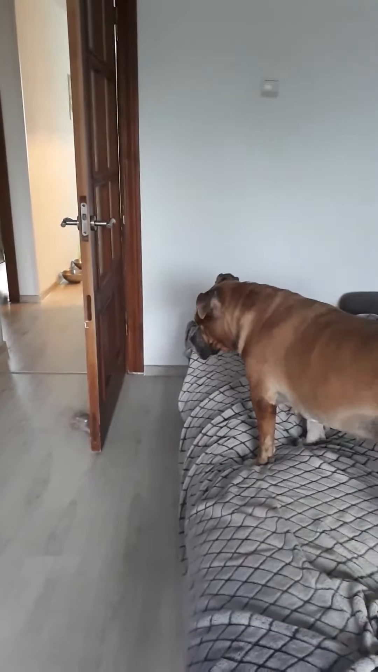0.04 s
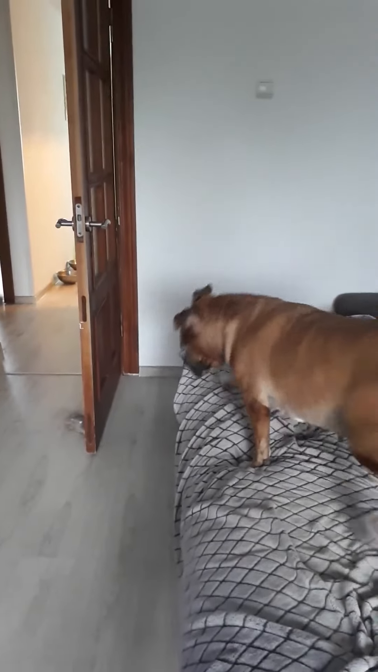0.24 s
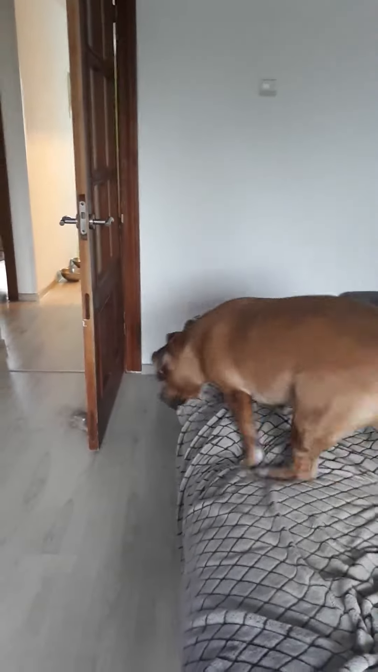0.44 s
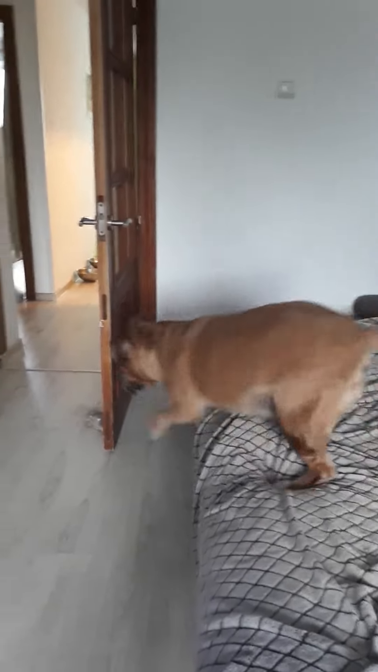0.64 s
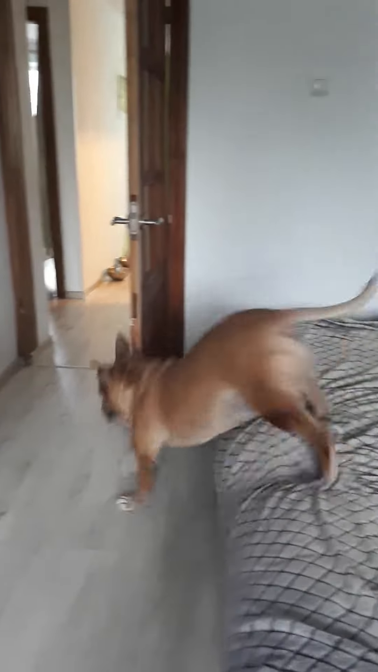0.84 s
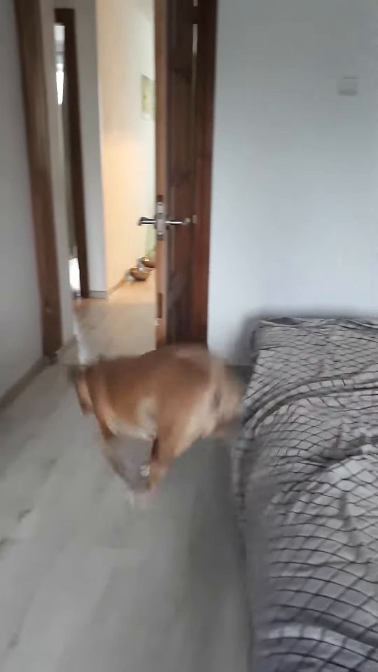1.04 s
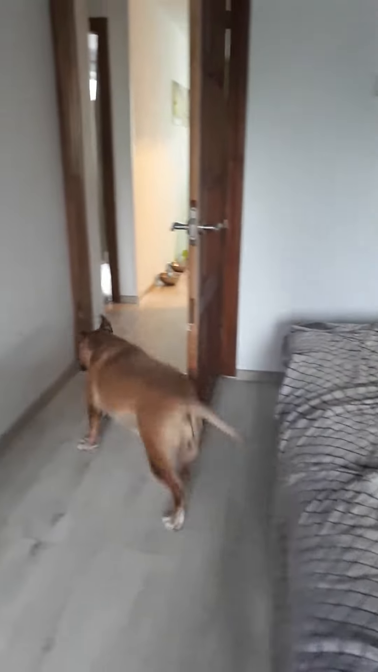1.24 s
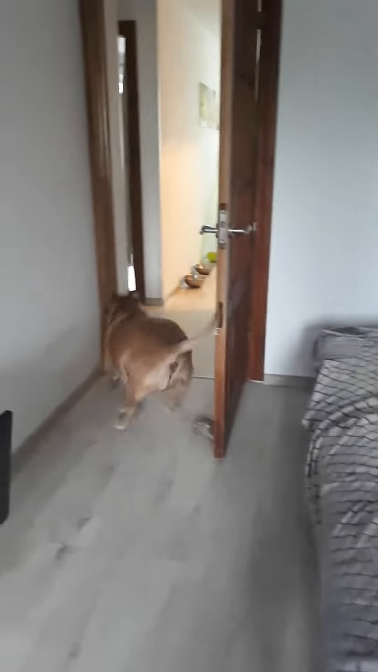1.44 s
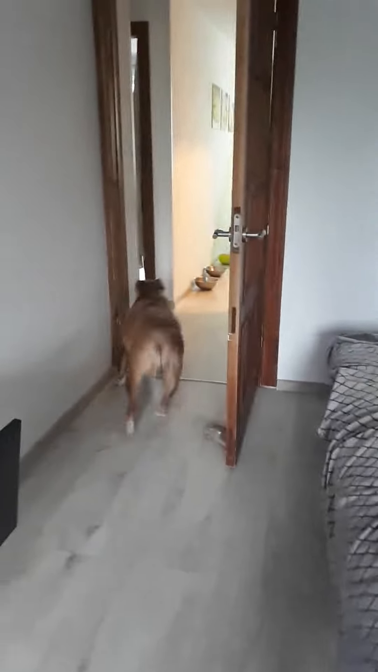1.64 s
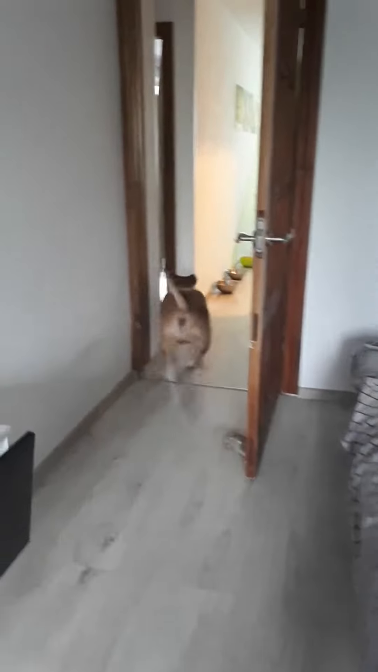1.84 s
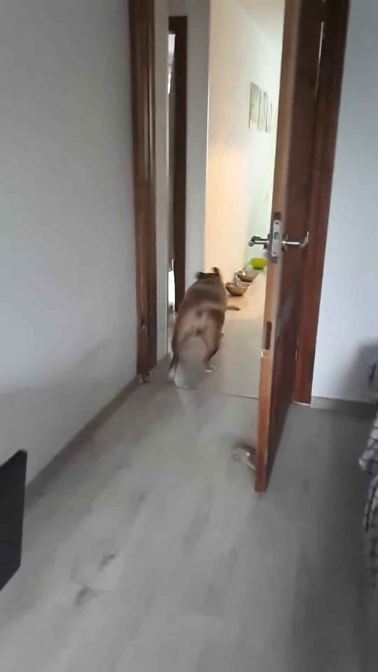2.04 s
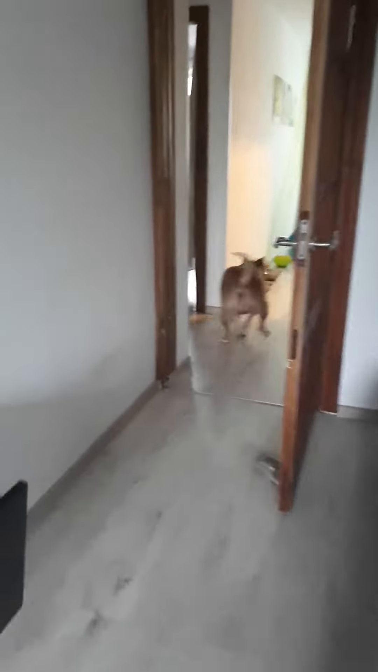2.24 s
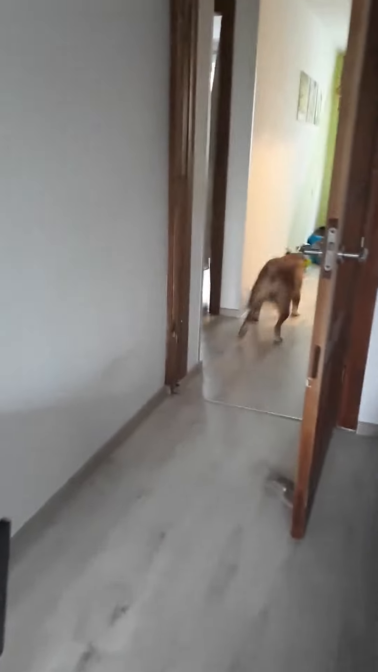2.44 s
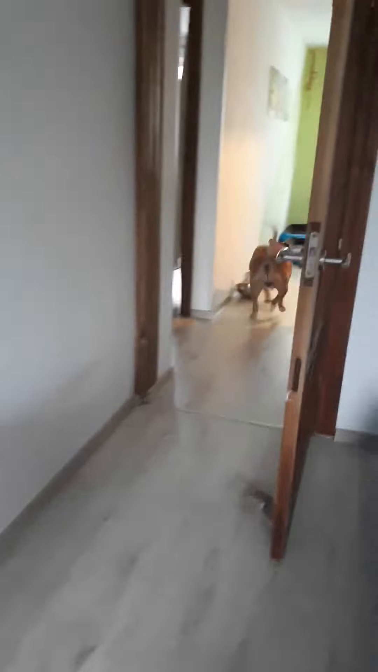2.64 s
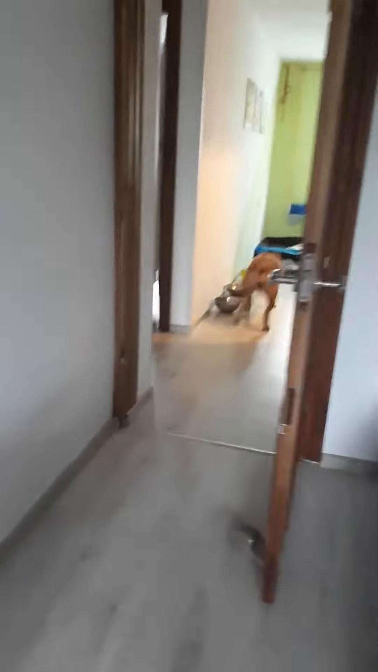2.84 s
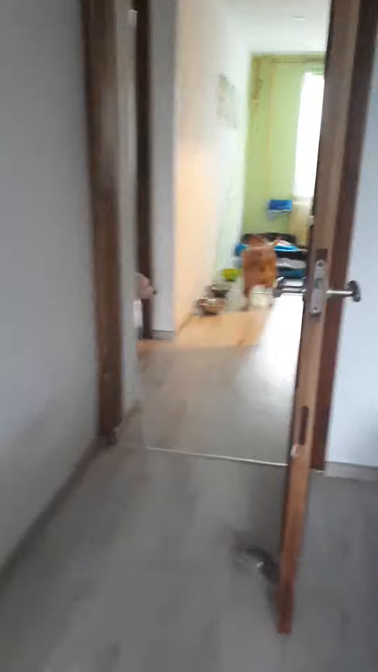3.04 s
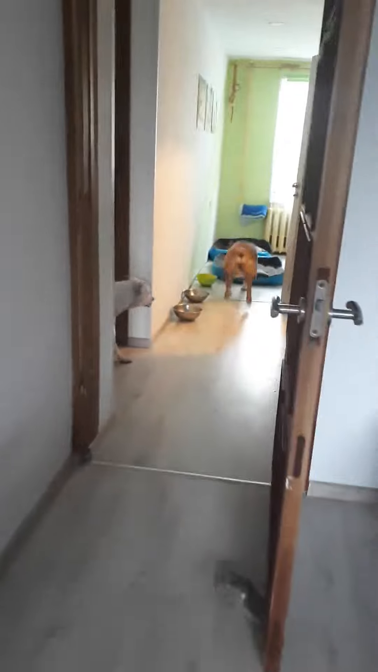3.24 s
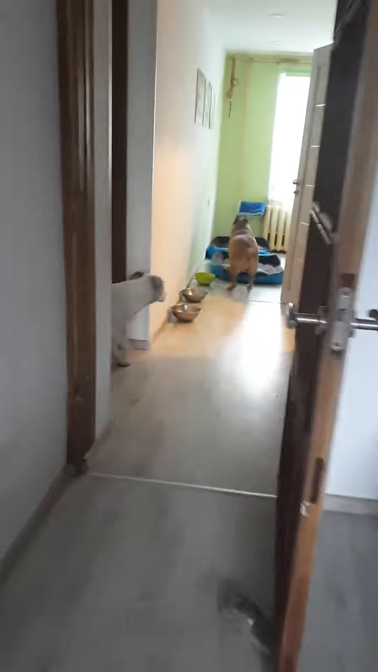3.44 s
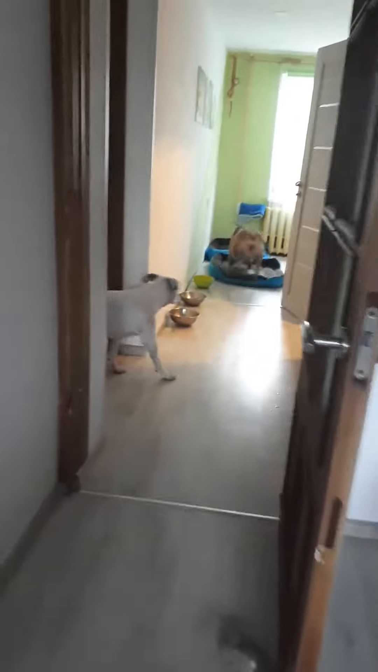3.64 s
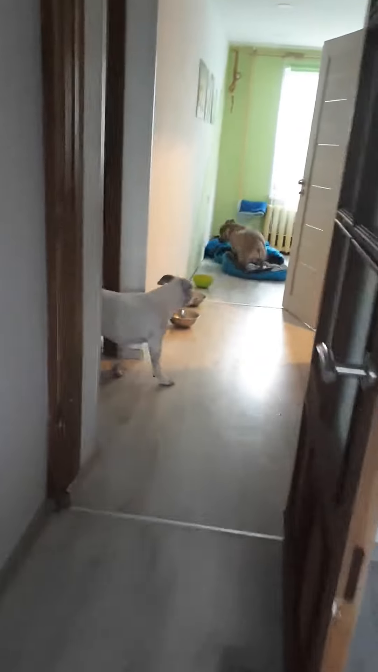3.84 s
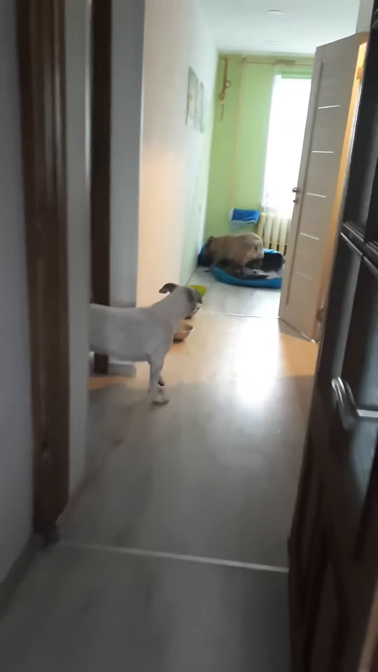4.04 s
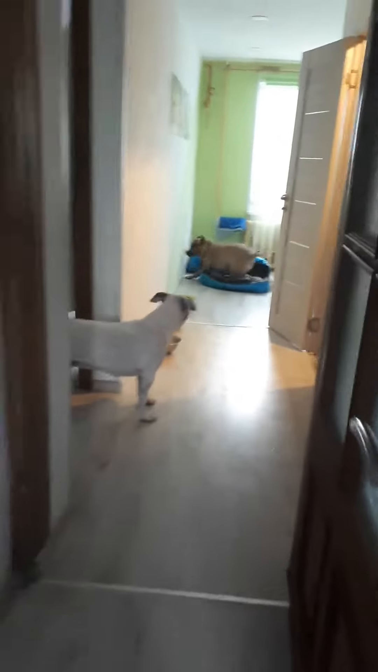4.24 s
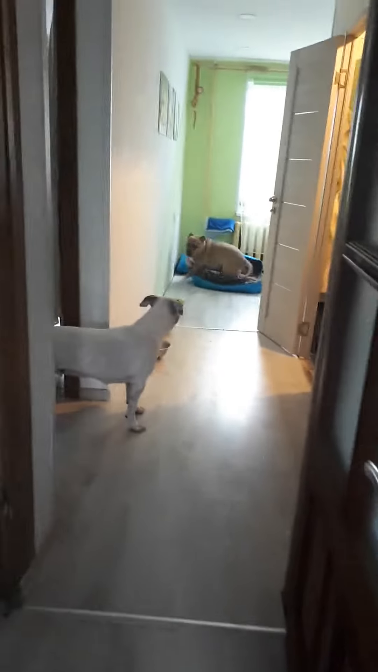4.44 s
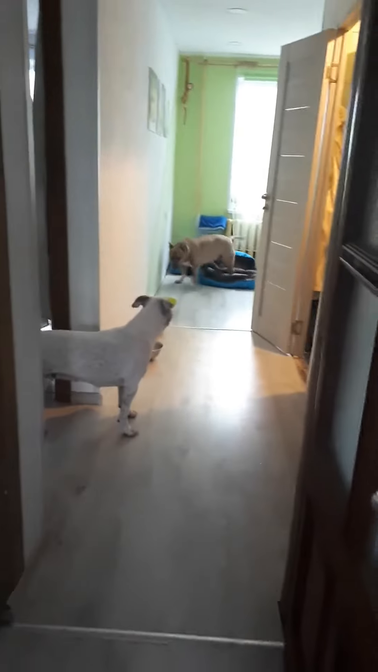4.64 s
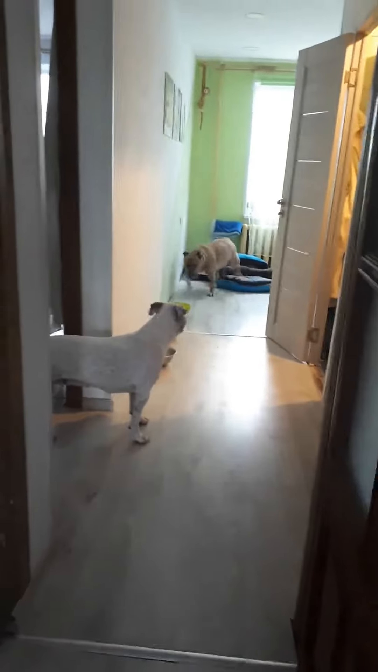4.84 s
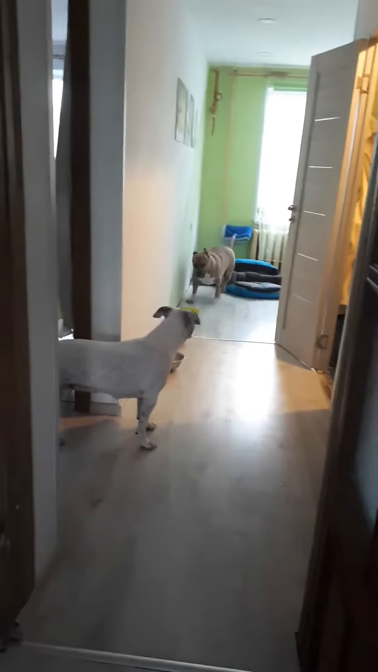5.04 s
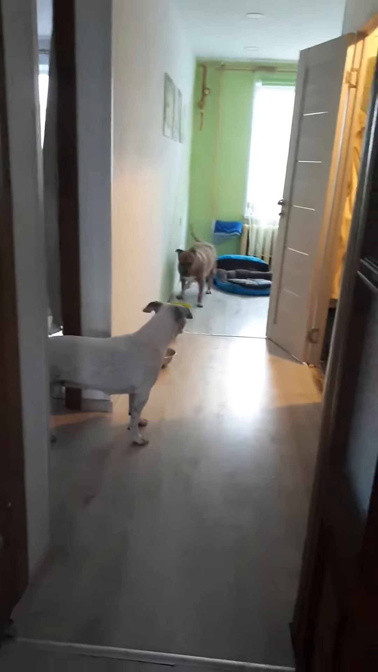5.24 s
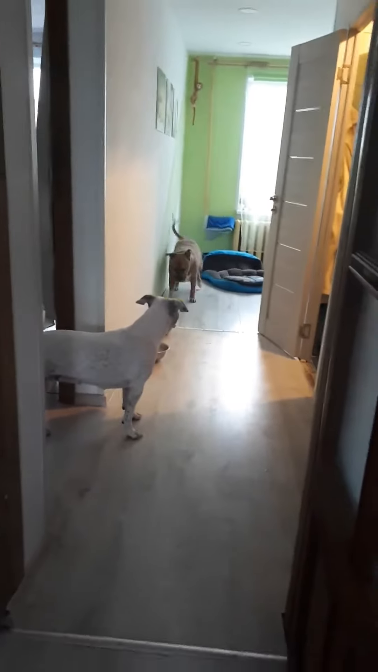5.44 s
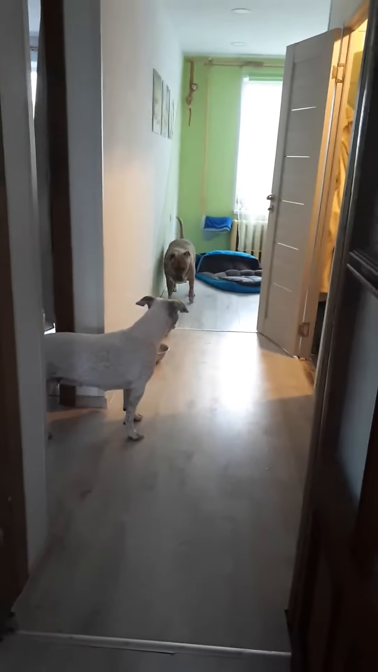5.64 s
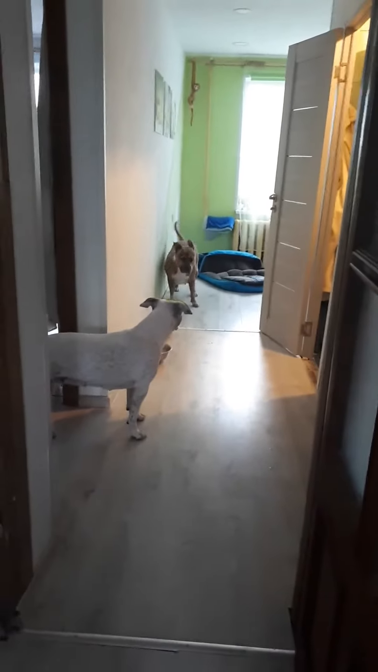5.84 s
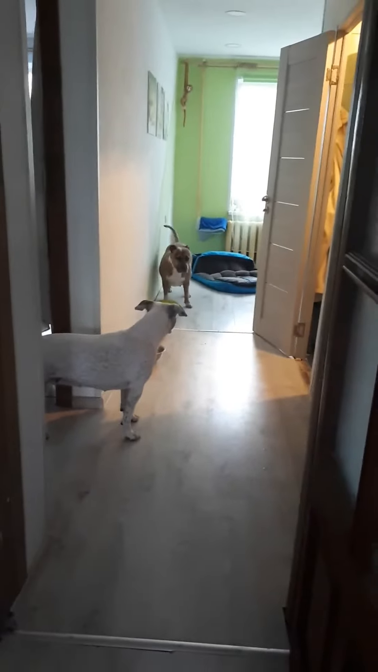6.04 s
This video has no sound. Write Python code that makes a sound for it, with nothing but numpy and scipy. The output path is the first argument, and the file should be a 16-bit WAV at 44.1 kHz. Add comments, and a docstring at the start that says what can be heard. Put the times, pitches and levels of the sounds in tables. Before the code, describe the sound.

A quiet flat with faint steady background noise. From 0 to 0.8 seconds there is only soft, dull cloth rustling and a slight paw movement on a sofa. Around 0.8 a tiny wavering squeak leads into the landing at 0.9: a loud, sharp claw clack with a woody thud on laminate. Between 1.1 and 1.35 claws scrabble in a dense, bright, gritty cluster. From 1.4 to 3.7 irregular nail ticks, short skids and soft pad thumps trot away down a bare hallway, becoming fainter and more ringing. At 3.7 crisp bedding rustles, continuing to about 5, with a stronger thump and claw click at 4.1. From 4.5 to 5.5 sparse, distant claw taps and board knocks mark the dog stepping out. At 5.6 a dull, hollow knock sounds close to the microphone with a quick small rebound, then a last faint tick near 5.8.

```python
"""A dog's claws tick and skid as it jumps off a sofa and trots down a laminate hallway to its bed,
turns round in it and steps out: bursts of gritty contact excite a resonance of nail and board.
Pads thud as decaying floor modes and noise; the bare rooms ring, more so as the dog gets further away.
Cloth rustles on the sofa and in the bed as enveloped noise, and a faint wavering tone squeaks at the jump.
Near the end a dull knock close by, with a small rebound, rings in damped modes over a faint steady noise."""
import sys
import numpy as np
from scipy import signal
from scipy.fft import rfft, irfft
from scipy.io import wavfile
from scipy.ndimage import uniform_filter1d

SR = 44100
rng = np.random.default_rng(int(sys.argv[2]) if len(sys.argv) > 2 else 0)


def transcribe(u):
    """Save the signal u as a 16-bit wav file named by the first command-line argument.

    u: samples, shape (n,) or (channels, n), limited to [-1, 1]; the rate is SR.
    q: integer samples, one column per channel.
    """
    v = np.clip(np.atleast_2d(u).T, -1, 1)
    q = np.round(v * 32767).astype(np.int16)
    wavfile.write(sys.argv[1], SR, q)


N = 269362
TIME = np.arange(N) / SR
CONTACT_TIME = TIME[:8192]  # time axis of one contact burst
CUTOFF_HZ = 15900  # upper limit of the sound
TROT_FROM_S, TROT_UNTIL_S = 1.18, 3.7


def from_db(db):
    """Logarithmic level: decibels to amplitude gain."""
    return 10 ** (np.asarray(db) / 20)


def rms_one(x):
    """Power normalisation: scale to unit rms."""
    return x / np.sqrt(np.mean(x ** 2) + 1e-20)


def energy_one(x):
    """Energy normalisation: scale to a unit sum of squares."""
    return x / np.sqrt(np.sum(x ** 2) + 1e-20)


def at_hz(points, hz):
    """Logarithmic frequency: interpolate a table over log-frequency."""
    freqs, values = np.transpose(points)
    return np.interp(np.log(np.maximum(hz, 1)), np.log(freqs), values)


def colour(x, points):
    """Minimum phase: a causal filter whose response follows from its dB spectrum by the cepstrum."""
    size = 4096
    gain_db = at_hz(points, np.fft.rfftfreq(size, 1 / SR))
    cepstrum = irfft(np.log(from_db(gain_db)))
    # fold the cepstrum onto positive time
    cepstrum[1:size // 2] *= 2
    cepstrum[size // 2 + 1:] = 0
    response = irfft(np.exp(rfft(cepstrum)))
    return signal.fftconvolve(x, response)[:len(x)]


def resonate(x, hz, width_hz):
    """Damped resonance: a two-pole filter with unit gain at its peak."""
    r = np.exp(-np.pi * width_hz / SR)
    numerator = np.array([1, 0, -1]) * (1 - r * r) / 2
    denominator = [1, -2 * r * np.cos(2 * np.pi * hz / SR), r * r]
    return signal.lfilter(numerator, denominator, x + 1e-18)


def linger(x, modes):
    """Modal superposition: narrow resonances prolong a few pitches of a sound."""
    return x + sum(from_db(db) * resonate(x, hz, width) for hz, width, db in modes)


def struck(modes, contact_s):
    """Modal decay: one soft blow sets off damped sines, alternating in sign."""
    t = TIME[:SR // 2]
    ring = 0
    for k, (hz, db, t60) in enumerate(modes):
        ring = ring + (-1) ** k * from_db(db - 60 * t / t60) * np.sin(2 * np.pi * hz * t)
    return ring * (1 - np.exp(-t / contact_s))


def burst(rise_s, decay_s, grain_db, evenness=0.75):
    """Frictional contact: a patter of uneven tiny impacts swells and dies; flattened spectrum, unit energy."""
    t = CONTACT_TIME
    grain_levels = np.repeat(rng.standard_normal(len(t) // 32), 32)
    sizes = from_db(grain_db * grain_levels)
    shape = sizes * (1 - np.exp(-t / rise_s)) * np.exp(-t / max(decay_s, 1e-4))
    spectrum = rfft(rng.standard_normal(len(t)) * shape)
    even = irfft(spectrum / (np.abs(spectrum) + 1e-12) ** min(evenness, 1))
    # flattening smears the burst in time, so fade its tail
    return energy_one(even * np.exp(-t / (8 * max(decay_s, 1e-4))))


def add(track, s, sound):
    """Linear superposition: mix a sound into a track at a given time."""
    start = round(s * SR)
    track[start:start + len(sound)] += sound[:len(track) - start]


# likeness of diffuse sound at the two microphones: (frequency [Hz], correlation [-1 to 1])
LIKENESS = [(100, 0.96), (200, 0.97), (350, 0.88), (700, 0.49), (1300, 0.0074), (16000, 0.12)]


def diffuse_bands(size):
    """Diffuse-field coherence: half-octave noise bands, (Hz, stereo band), correlated as from all sides."""
    edges = 40 * 2 ** (np.arange(19) / 2)
    white = rng.standard_normal((2, 2, size))
    for k, (low, high) in enumerate(zip(edges, edges[1:])):
        band_pass = signal.butter(2, [low, high], "band", fs=SR, output="sos")
        # neighbouring bands use independent noise
        mid, side = signal.sosfilt(band_pass, white[k % 2])
        hz = np.sqrt(low * high)
        alike = np.clip(at_hz(LIKENESS, hz), -1, 1)
        yield hz, np.sqrt(1 + alike) * mid + np.sqrt(1 - alike) * side * [[1], [-1]]


def wash(spectrum):
    """Filtered noise: diffuse stereo noise of a given colour, unit rms."""
    return rms_one(sum(band * from_db(at_hz(spectrum, hz)) for hz, band in diffuse_bands(N)))


# hallway reverberation: (frequency [Hz], decay by 60 dB [s])
HALL_T60 = [(70, 0.81), (160, 0.33), (350, 0.35), (800, 0.41), (2000, 0.57), (4500, 0.54), (7000, 0.35),
            (13000, 0.29)]


def hall(x, gap_s, build_s):
    """Reverberation: reflections thicken after a short gap and decay exponentially band by band."""
    t, response = TIME[:SR], 0
    build = 1 - np.exp(-np.maximum(t - gap_s, 0) / build_s)
    for hz, band in diffuse_bands(SR):
        decay = from_db(-60 * t / at_hz(HALL_T60, hz))
        # weight by bandwidth, so that the energy per Hz is even
        response = response + np.sqrt(hz) * energy_one(band * build * decay)
    return signal.fftconvolve(x[None], np.sqrt(2) * energy_one(response), axes=1)[:, :N]


# spectrum of the quiet in the flat: (frequency [Hz], relative level per Hz [dB])
QUIET = [(18, -31), (30, 11), (124, -4.5), (461, -13.5), (1220, -17.5), (1460, -20.5), (7470, -23.5),
         (8080, -23.5), (12000, -30), (16000, -25)]


def quiet():
    """Stationary noise: the steady, faint background of the flat."""
    quiet_db = -66.5
    return from_db(quiet_db) * wash(QUIET)


SHIFT_ATTACK_S, SHIFT_SAG_DB_PER_S, SHIFT_RELEASE_DB_PER_S = 0.053, 1, 47


def swell(s, length_s):
    """Amplitude envelope: a movement builds up, sags while it lasts, then dies away."""
    t = np.maximum(TIME - s, 0)
    fall_db = SHIFT_SAG_DB_PER_S * t + SHIFT_RELEASE_DB_PER_S * np.maximum(t - length_s, 0)
    return np.minimum(t / SHIFT_ATTACK_S, 1) * from_db(-fall_db)


# shifts of weight on the soft sofa cover, later in the crisper bed:
# (time [s], length [s], rustle level [dB], heave level of the cushions [dB], upper edge of the rustle [Hz])
SHIFTS = [(0.16, 1.48, -69.5, -63.5, 2800), (0.433, .04, -53.5, -52, 2620),
          (3.708, 0.17, -40.5, -53, 15200), (3.94, 1.1, -43.5, -62.5, 14960), (4.18, 0.12, -43, -67, 15000)]
# spectrum of rubbing cloth: (frequency [Hz], relative level per Hz [dB])
RUSTLE_COLOUR = [(47, -33), (80, -31), (203, 4), (369, -8.5), (563, -2.5), (768, -5.5), (1120, -1.5),
                 (1280, -7.5), (2040, -2), (3320, -7.5), (6170, -9), (8600, -44.5), (14000, -8),
                 (16000, -50)]
# dull spectrum of heaving cushions, also of thudding pads: (frequency [Hz], relative level per Hz [dB])
THUMP_COLOUR = [(25, -18.5), (45, -1.5), (65, 2.5), (110, 3), (170, -2), (260, -5), (380, -16),
                (700, -17.5), (2000, -67.5)]


def fabric(flutter_db=0.36):
    """Friction noise: cloth hisses unevenly at each shift of weight, and the cushions under it heave."""
    swish_db = -54.5  # coat and legs swish faintly during the trot
    cloth = wash(RUSTLE_COLOUR)
    rub = from_db(swish_db) * swell(TROT_FROM_S, TROT_UNTIL_S - TROT_FROM_S) * cloth
    heave = 0
    for s, length_s, rustle_db, heave_db, edge_hz in SHIFTS:
        movement = swell(s, length_s)
        # each movement rubs another patch of cloth
        patch = np.roll(cloth, rng.integers(N), axis=1)
        soften = signal.butter(4, min(edge_hz, CUTOFF_HZ), fs=SR, output="sos")
        rub = rub + from_db(rustle_db) * movement * signal.sosfilt(soften, patch)
        # overlapping heaves add in power
        heave = np.hypot(heave, from_db(heave_db) * movement)
    catching = rms_one(uniform_filter1d(rng.standard_normal(N), size=700))
    return rub * from_db(flutter_db * catching) + heave * wash(THUMP_COLOUR)


# dull knock close by and its rebound: (time [s], level [dB])
KNOCKS = [(5.582, -18.5), (5.630, -29)]
# modes it rings with: (frequency [Hz], level [dB], decay by 60 dB [s])
KNOCK_MODES = [(175, -8, 0.11), (223, -33, .16), (289, -13, 0.35), (328, -8.5, 0.2), (384, -25, .2),
               (496, -5, 0.075), (576, -9, 0.16), (780, -21, 0.059), (1136, -19, 0.067)]
# spectrum of its thud: (frequency [Hz], relative level [dB])
KNOCK_COLOUR = [(50, -41), (120, -8), (280, 0.5), (400, -5), (550, 2), (800, -9), (1080, -9.5), (1300, -19),
                (4000, -44)]


def knock(ring_db=-5.5, thud_db=16.0, room_db=2.5):
    """Impact excitation: a soft bump on something hollow gives a thud and a modal ring."""
    track = np.zeros(N)
    for s, level_db in KNOCKS:
        contact = burst(rise_s=0.0012, decay_s=0.0074, grain_db=1.0, evenness=0.68)
        thud = energy_one(colour(contact, KNOCK_COLOUR))
        add(track, s, from_db(level_db + ring_db) * struck(KNOCK_MODES, contact_s=0.0013))
        add(track, s, from_db(level_db + thud_db) * thud)
    return track + from_db(room_db) * hall(track, gap_s=0.0017, build_s=0.0025)


def squeak(waver_hz=100):
    """Frequency modulation: a thin tone of wavering pitch swells and stops as the dog pushes off the sofa."""
    start_s, length_s, level_db, centre_hz = .805, .075, -57, 1780
    pitch = centre_hz + waver_hz * rms_one(uniform_filter1d(rng.standard_normal(N), size=100))
    progress = np.clip((TIME - start_s) / length_s, 0, 1)
    envelope = 2 * np.sqrt(progress * (1 - progress))
    tone = from_db(level_db) * envelope * np.sin(2 * np.pi * np.cumsum(pitch) / SR)
    return tone + hall(tone, gap_s=0.0027, build_s=0.0019)


# pads landing: (time [s], overall level [dB], board pitch [Hz], slap and clack level [dB], deep bass gain [dB])
PADS = [(0.463, -48, 185, 7.5, -18), (0.858, -35.5, 123, 3, -3.5), (.918, -15.5, 173, 1.5, -9),
        (0.963, -24, 151.6, 5, -13.5), (1.14, -21.5, 264, -0.5, -6), (1.181, -17, 105, 2.5, -9.5),
        (1.219, -25.5, 117, -17.5, 2), (1.301, -21.5, 76, -1, -2), (1.522, -20, 80.5, -10.5, 4),
        (1.579, -31.5, 202, -9, -4), (1.72, -16.5, 203, -13, -3), (1.915, -27, 174, -3, 3),
        (1.975, -26.5, 213, -9, -9), (2.099, -25, 117.4, -7.5, -5), (2.355, -30.5, 122, -15, 11),
        (2.483, -30.5, 113, -9, -5.5), (2.692, -30, 119, -4, -4), (2.747, -27, 197, -7.5, -1),
        (2.839, -33.5, 162, -2, 6), (2.91, -40, 107, -0.5, 2), (3.04, -40, 90, -10, -5.5),
        (3.159, -31, 148, -27, -4), (3.255, -28.5, 83, -16, -4), (3.443, -21.5, 94, -14, -9),
        (3.493, -22, 76, -24, -10), (3.63, -26, 179, -38, 5), (3.667, -29, 97, -38, -12),
        (4.113, -15, 170, -24, -14.5), (4.608, -37.5, 273, -6, -5), (4.726, -33.5, 132, -4, -4),
        (4.85, -19.5, 164.6, -1, -28.5), (5.008, -30, 164, -7, 4), (5.273, -43.5, 154, -30, 2),
        (5.529, -37.5, 150, -28, 2), (5.82, -48, 115, -21, -6)]
# spectrum of a pad's slap: (frequency [Hz], relative level [dB])
SLAP_COLOUR = [(40, -21), (120, -5.5), (250, -9.5), (370, -1), (520, -3), (620, 9), (760, -1), (1100, -1.5),
               (1600, -31), (4000, -45.5)]
# a laminate plank slapped down on its underlay: (frequency [Hz], level [dB], decay by 60 dB [s])
PLANK_MODES = [(413, -3.5, 0.049), (458, -5.5, 0.13), (521, -14, 0.3), (578.5, -4.5, 0.095),
               (659, -25.5, 0.074)]
# low resonances of floor and hallway: (frequency [Hz], width [Hz], gain [dB])
BOOM_MODES = [(191, 15, 4), (337, 30, 7.5), (460, 24, 7.5), (540, 5.7, -37)]


def pads(push_db=-4.0, thump_db=14.0, slap_db=9.5, plank_db=-6.0, board_t60=0.097, room_db=1.0):
    """Structure-borne sound: a paw's weight sets the floating floor booming, the pad slaps, a plank clacks."""
    track, boards = np.zeros(N), np.zeros(N)
    plank = struck(PLANK_MODES, contact_s=0.0053)
    for s, weight_db, hz, hard_db, deep_db in PADS:
        weight = from_db(weight_db)
        board = struck([(hz, 0, board_t60)], contact_s=0.0016)
        heavy = burst(rise_s=0.0095, decay_s=0.017, grain_db=3.0, evenness=1.0)
        thump = energy_one(colour(heavy, THUMP_COLOUR))
        thump = colour(thump, [(85, deep_db), (150, 0.017)])
        sharp = burst(rise_s=0.001, decay_s=0.013, grain_db=4.5, evenness=0.88)
        slap = energy_one(colour(sharp, SLAP_COLOUR))
        add(boards, s, weight * (from_db(push_db) * board + from_db(hard_db + plank_db) * plank))
        add(track, s, weight * (from_db(thump_db) * thump + from_db(hard_db + slap_db) * slap))
    # the boards radiate poorly into the room and reach the microphone mostly along the floor
    airborne = linger(track, BOOM_MODES) + from_db(-4.0) * boards
    return track + boards + from_db(room_db) * hall(airborne, gap_s=0.0027, build_s=0.0023)


# the dog's way from the sofa to its bed: (time [s], distance [m], left minus right level [dB])
PATH = [(.88, 2.95, -0.5), (1.3, 2.6, -2), (1.599, 5.6, -0.5), (3.4, 16.8, -0.1), (5.8, 16.4, -1.1)]


def on_path(s):
    """Source position: distance and bearing of the dog, interpolated in time."""
    times, *columns = np.transpose(PATH)
    return [np.interp(s, times, column) for column in columns]


# a longer skid also starts more softly: rise time over decay time
SKID_RISE_SHARE = 0.39
# nail ticks: how many, over how many skid decay times, level against the skid, decay of a tick
NAIL_COUNT, NAIL_SPREAD, NAIL_DB, NAIL_DECAY_S = 4, 2.2, -7, 0.00049


def paw_contact(skid_s):
    """Sliding friction: a short gritty skid, with the nails ticking one after another on top."""
    paw = burst(rise_s=SKID_RISE_SHARE * skid_s, decay_s=skid_s, grain_db=2.5, evenness=0.8)
    for delay in np.sort(rng.random(NAIL_COUNT)) * NAIL_SPREAD * skid_s:
        nail = burst(rise_s=0.0004, decay_s=NAIL_DECAY_S, grain_db=2.0)
        add(paw, delay, from_db(NAIL_DB) * nail)
    return paw


# a harder strike has more top and less wood: gain at hardness 0 [dB], change per dB of hardness
WOOD_DB, WOOD_PER_HARDNESS = 8, -0.21
TOP_DB, TOP_PER_HARDNESS = -3.5, 0.55
# reflections over the straight path at one metre, and their gain for each doubling of the distance
WET_DB, WET_DB_PER_DOUBLING = 0.35, 2
BRUSH_LEAD_S, BRUSH_DB = .009, -0.5
STRIKE_DELAY_S, RIGHT_LAG_S = .0005, 0.0003284
# claw strikes, the first three only on the sofa cover:
# (time before the strike delay [s], level [dB], ring pitch [Hz], hardness [dB], skid decay [s])
CLAWS = [(.2535, -46.5, 6640, 6, 0.0061), (.4584, -42.5, 6870, 2, 0.01), (.792, -47.5, 6700, -4.5, 0.0033),
         (.8803, -5, 6700, 0, 0.0041), (.9185, -10, 7040, 11.5, 0.0059), (1.1308, -8.5, 6840, 9, 0.0018),
         (1.1352, -7.5, 6400, 8, .0028), (1.1818, -7.5, 6940, 15, 0.0034), (1.1888, -6.5, 4800, 13, 0.0053),
         (1.2089, -10.5, 6050, -0.5, 0.0024), (1.301, -26, 4900, -23, 0.0043),
         (1.3128, -10, 4700, -21, .001), (1.3224, -20.5, 4430, 8, 0.0021), (1.4156, -26, 4940, -2, 0.0026),
         (1.5378, -15.5, 5370, 1, .003), (1.579, -15, 5330, 5, .004), (1.732, -18, 2270, -7, 0.0052),
         (1.7697, -20, 5450, -2, 0.0025), (1.9394, -17, 4070, 1, 0.0043), (1.9934, -20, 4860, 11, .0026),
         (2.106, -19, 4300, -1.5, .0018), (2.1888, -20.5, 4380, 3, .0035),
         (2.3288, -15.5, 4300, 11.5, 0.0044), (2.369, -14, 4300, 12, 0.0033),
         (2.3942, -21, 4300, 7, 0.0051), (2.5261, -27.5, 3860, 1, 0.0016),
         (2.6845, -13.5, 4300, 8.5, 0.0041), (2.867, -20.5, 4160, 2.5, 0.0034),
         (2.931, -25, 4000, -1, 0.0035), (3.0646, -27, 4060, 3, 0.0045), (3.1113, -21, 4300, 10, 0.0013),
         (3.2637, -23, 3010, 6.5, 0.0041), (3.2845, -24.5, 4330, -16, 0.0049),
         (3.369, -33, 4670, -4, 0.0036), (3.4086, -30, 4260, -6.5, 0.027),
         (3.491, -23.5, 3800, 7.5, 0.0074), (3.661, -31.5, 4150, -4, .007),
         (4.1016, -11.5, 2900, 12, 0.004), (4.1074, -13, 4630, -34, .0025),
         (4.4872, -19.5, 3360, -2, 0.0049), (4.488, -24.5, 6550, 6, 0.014),
         (4.6074, -21.5, 3600, -9, 0.0045), (4.7192, -18.5, 3670, -14.5, 0.0041),
         (4.8524, -14, 3700, 6, 0.0041), (5.0041, -17.5, 4340, 11, 0.0049),
         (5.0813, -20.5, 3750, 6.5, 0.0049), (5.2849, -35, 2620, -4, 0.0039),
         (5.376, -22, 3700, 7.5, 0.0066), (5.5279, -22, 5460, 1, 0.0045), (5.6995, -33, 3830, -18, 0.0032),
         (5.8127, -24, 3600, 0, 0.0032)]
# thin lingering rings in the clatter: (frequency [Hz], width [Hz], gain [dB])
BRIGHT_MODES = [(2418, 17, -40), (4250, 24, -2), (4200, 24, -13.5), (4800, 15.2, -12), (6000, 19, -15),
                (6050, 300, -3.5), (5900, 38, -10.5), (6400, 31, -14), (6740, 13, -13.5), (6100, 35, -22)]
# colour of the whole clatter: (frequency [Hz], gain [dB])
CLAW_COLOUR = [(100, -22.5), (400, -13), (900, -6), (1350, -9), (1800, -3), (2500, 2), (3200, 3.5),
               (4300, 6.5), (5600, 4.5), (6800, 4), (7600, -0.5), (8600, -8.5), (11500, -9), (15500, -21)]


def claws(tick_db=12.0, ring_db=13.5, far_ring_db=-2.0, ring_width_hz=620):
    """Resonant contact: landing, skidding claws ring at the pitch of nail and board; reflections grow with distance."""
    direct, sent = np.zeros((2, N)), np.zeros((4, N))
    for k, (s, level_db, hz, hardness_db, skid_s) in enumerate(CLAWS):
        metres, _ = on_path(s)
        wood_db = WOOD_DB + WOOD_PER_HARDNESS * hardness_db
        top_db = TOP_DB + TOP_PER_HARDNESS * hardness_db
        tone = [(1800, wood_db), (3800, 0), (7200, 0.003), (9000, top_db)]
        contact = paw_contact(skid_s)
        ringing = contact + from_db(ring_db) * resonate(contact, hz, ring_width_hz)
        tick = from_db(level_db + tick_db) * energy_one(colour(ringing, tone))
        # the straight path keeps more of the top than the reflections
        tick = colour(tick, [(1500, 1.9), (7200, 1.75), (9500, 5.1)])
        # the lag between the channels varies from paw to paw
        lag_s = RIGHT_LAG_S + .0002 * rng.standard_normal()
        add(direct[0], s + STRIKE_DELAY_S, tick)
        add(direct[1], s + STRIKE_DELAY_S + lag_s, from_db(-1.5) * tick)
        # during the trot the claw tips brush the floor a moment before the weight comes down
        if TROT_FROM_S < s < TROT_UNTIL_S:
            touch = burst(rise_s=0.0013, decay_s=0.016, grain_db=0.5)
            brush = from_db(level_db + BRUSH_DB) * energy_one(resonate(touch, hz, width_hz=1600))
            for channel in direct:
                add(channel, s - BRUSH_LEAD_S, brush)
        # summed over all directions the ring is weaker
        far_ringing = contact + from_db(far_ring_db) * resonate(contact, hz, width_hz=850)
        spread = energy_one(colour(far_ringing, tone))
        wet_db = WET_DB + WET_DB_PER_DOUBLING * np.log2(metres)
        add(sent[k % len(sent)], s + STRIKE_DELAY_S, from_db(level_db + tick_db + wet_db) * spread)
    # successive paws land on different spots: four sets of reflections take turns
    reflected = sum(hall(linger(track, BRIGHT_MODES), gap_s=0.00025, build_s=0.00048) for track in sent)
    _, bearing_db = on_path(TIME)
    pan = from_db(bearing_db / 2 * np.array([[1], [-1]]))
    return pan * np.array([colour(channel, CLAW_COLOUR) for channel in direct + reflected])


def scene():
    """Superposition: the quiet of the flat, the cloth, the knock and the dog add up."""
    return quiet() + fabric() + knock() + squeak() + pads() + claws()


# quiet moments are turned down: threshold, dB per dB below it, deepest cut, averaging time
SUPPRESS_BELOW_DB, SUPPRESS_SLOPE, SUPPRESS_MAX_DB, SUPPRESS_S = -48.5, 0.86, 4.5, .04


def suppress(x):
    """Downward expansion: the gain sinks as the short-time level falls below a threshold."""
    power = uniform_filter1d(np.mean(x ** 2, axis=0), int(SUPPRESS_S * SR))
    below_db = SUPPRESS_BELOW_DB - 10 * np.log10(np.maximum(power, 1e-12))
    return x * from_db(-np.clip(SUPPRESS_SLOPE * below_db, 0, SUPPRESS_MAX_DB))


RUMBLE_CUT_HZ, OVERLOAD = 60, .95  # OVERLOAD: amplitude at which peaks saturate
# the two microphone ports differ in colour: (frequency [Hz], left minus right level [dB])
PORTS = [(100, 1.5), (550, 0.5), (1200, -2), (1900, -3.5), (2700, -2.5), (3700, 0), (5200, -3),
         (6000, -2.5), (6750, -8.5), (7250, 8), (8100, 12.5), (9500, 7), (11500, 7), (15000, 5.5)]


def record(dry):
    """Transduction: ports colour the channels, bass rolls off, quiet sinks, peaks saturate, the top is cut."""
    heard = []
    for channel, side in zip(dry, (1, -1)):
        heard.append(colour(channel, [(hz, side * db / 2) for hz, db in PORTS]))
    high_pass = signal.butter(4, RUMBLE_CUT_HZ, "high", fs=SR, output="sos")
    heard = signal.sosfilt(high_pass, heard)
    rounded = OVERLOAD * np.tanh(suppress(heard) / OVERLOAD)
    low_pass = signal.ellip(10, .1, 80, CUTOFF_HZ, fs=SR, output="sos")
    return signal.sosfilt(low_pass, rounded)


dry = scene()
out = record(dry)
transcribe(out)
```